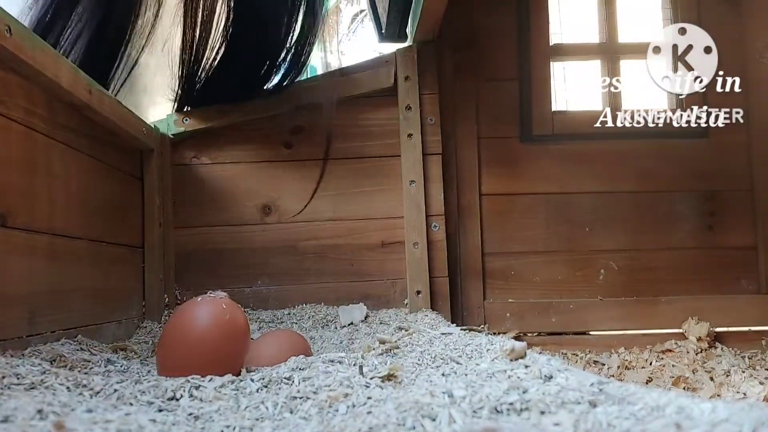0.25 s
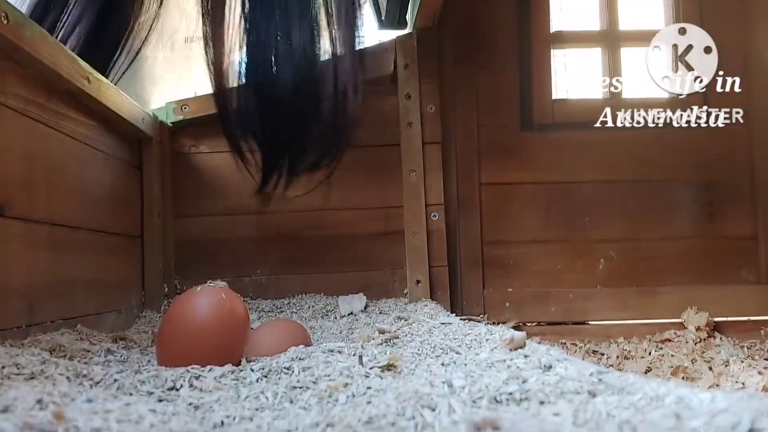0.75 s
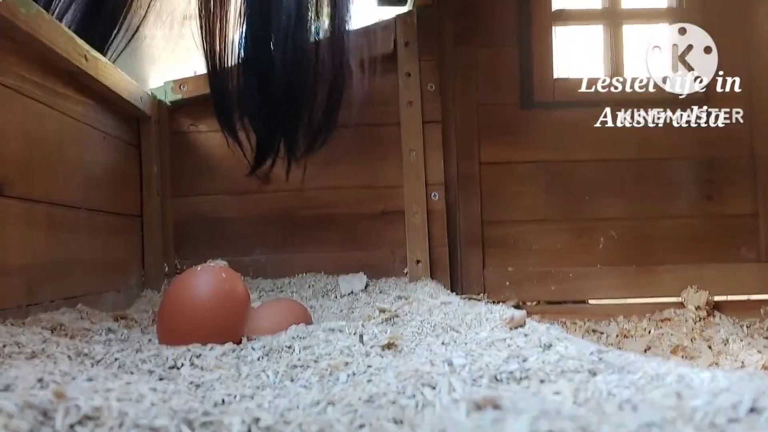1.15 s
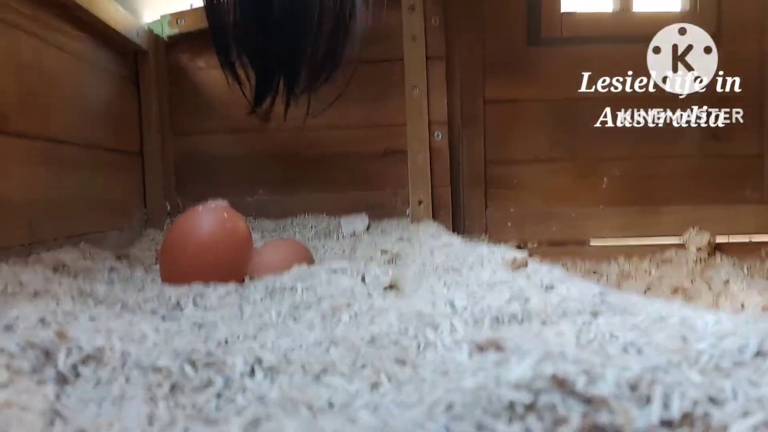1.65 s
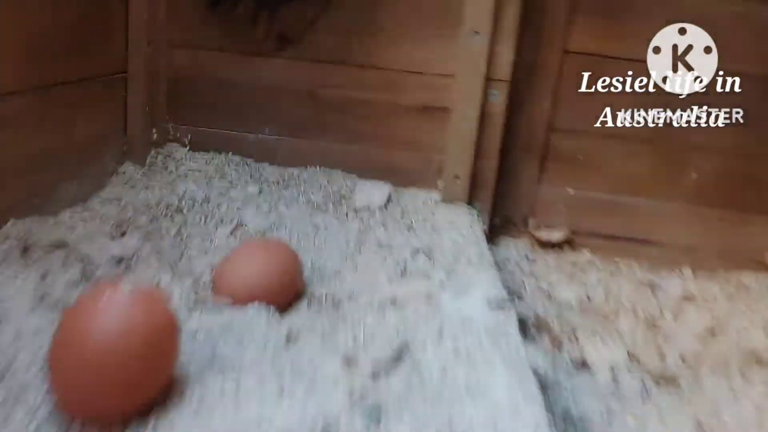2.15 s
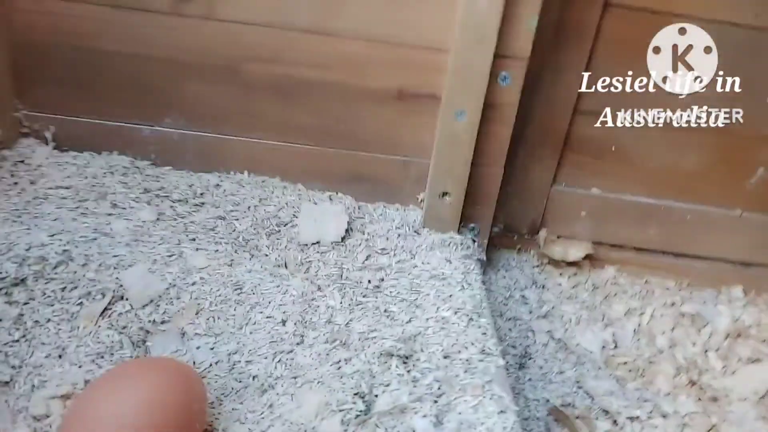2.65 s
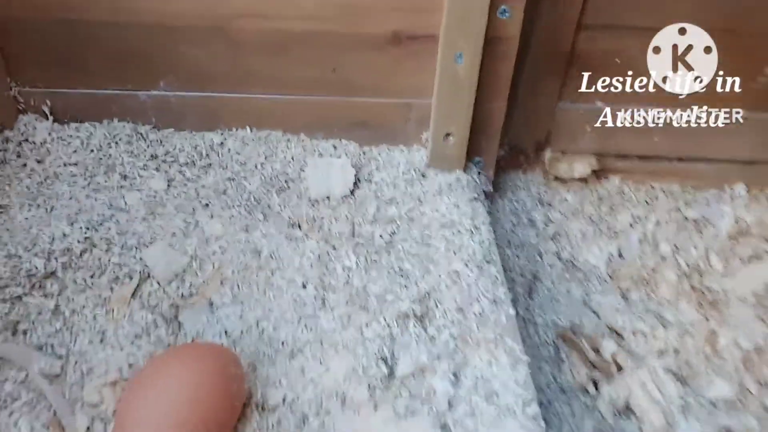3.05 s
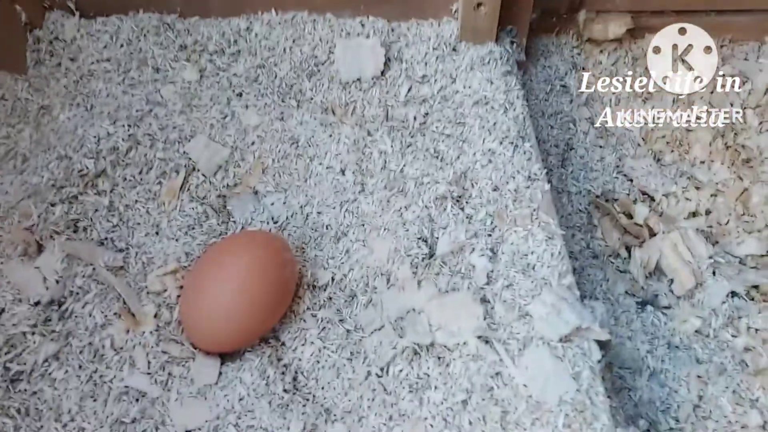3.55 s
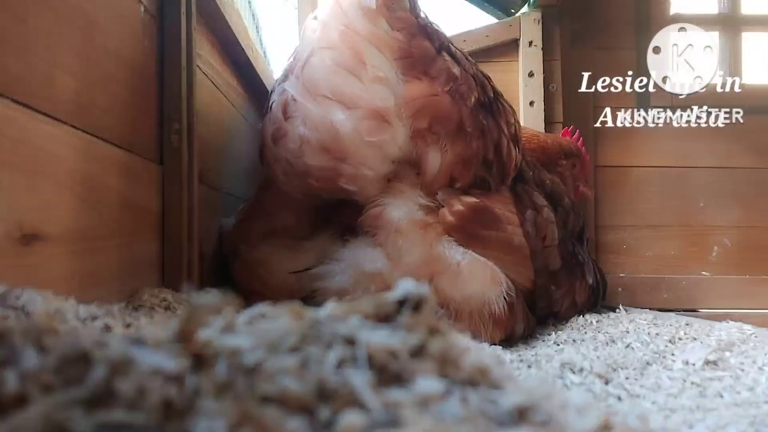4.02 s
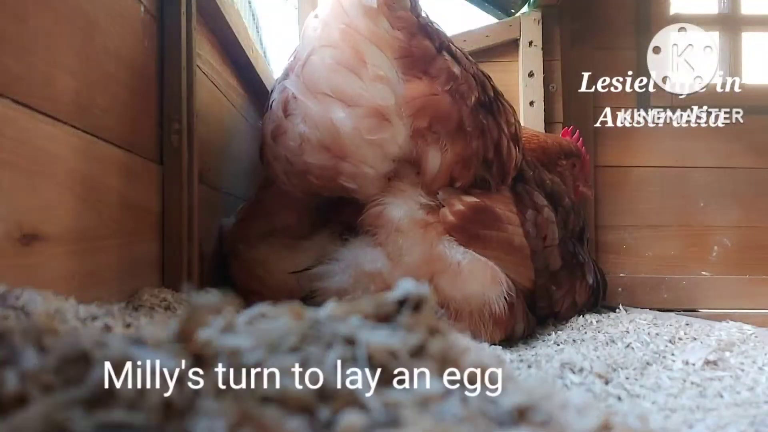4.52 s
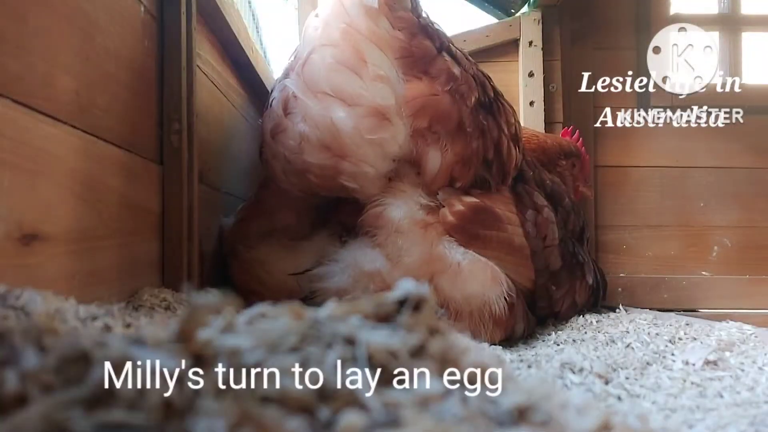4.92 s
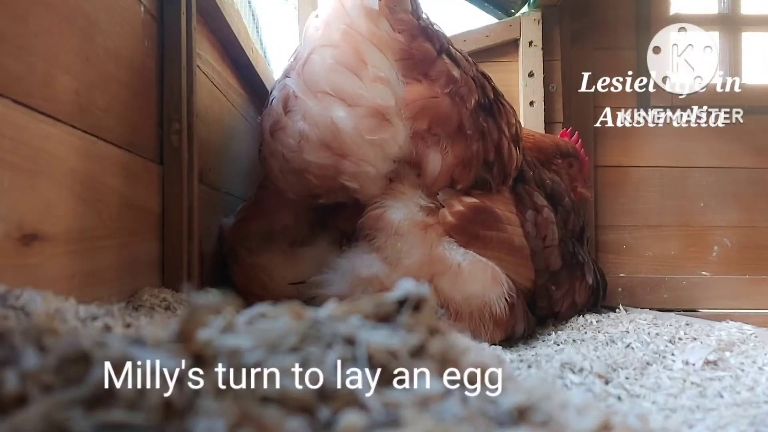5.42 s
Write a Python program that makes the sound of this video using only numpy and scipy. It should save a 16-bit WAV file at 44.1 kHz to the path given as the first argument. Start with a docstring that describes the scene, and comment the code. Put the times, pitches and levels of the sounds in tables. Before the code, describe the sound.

A stereo phone capture low in a wooden nest box, with faint hiss and low yard noise. From 0.07 s hollow knocks hit the boards, densest and strongest at 0.2 to 0.65 s, with short cracks and dry, grainy litter scraping. A loud, rough warbling squawk runs from 0.6 to 0.82 s. Single knocks follow near 0.9, 1.03, 1.38 and 1.85 s, with drags between and a faint squawk at 1.2 s. Small distant peeps come around 1.5, 2.3 and 3.1 s. A clear but softer squawk sounds at 2.5 s. A hen's trembling moan climbs in pitch from 2.4 to 3.25 s; another holds steadier from 3.35 to 3.9 s, with faint squawks near its end. Around 3.6 to 3.9 s the background changes to swelling low rumble and a wavering low hum. Very faint peeps pass at 4.5 s, then quiet downward clucks at 4.75, 4.97 and 5.05 s; rumble continues to the end.

```python
"""Soft hiss and low yard noise come first, then knocks on a wooden nest box and the scrape of its litter.
A fowl squawks with a warbling pitch, small peeps sound far off, a hen moans and others cluck late on.
Knocks ring a few decaying tones; litter is grainy noise; the birds are stacks of partials shaped by a throat.
Around 3.6 to 3.9 s the yard noise gives way to a low rumble and a wavering hum, made of noise and a sine.
Echoes of the birds fade out at about 3.91 s and return at 4.4 s."""
import sys
import numpy as np
from scipy import signal
from scipy.fft import rfft, irfft
from scipy.io import wavfile
from scipy.ndimage import uniform_filter1d

SR = 44100
rng = np.random.default_rng(int(sys.argv[2]) if len(sys.argv) > 2 else 0)


def store_pcm(level_fs):
    """Save levels as 16-bit WAV."""
    pcm = np.round(np.clip(level_fs, -1, 1) * 32767).astype(np.int16)
    wavfile.write(sys.argv[1], SR, np.atleast_2d(pcm).T)


N = 250488  # length in samples


def undb(db):
    """Turns decibels into a plain gain."""
    return 10 ** (np.asarray(db) / 20)


def unit(x):
    """Scales a signal to an average strength (rms) of 1."""
    return x / np.sqrt(np.mean(x ** 2))


def at_hz(table, hz):
    """Reads a value between (frequency, value) points, on a log-frequency axis."""
    f, v = np.transpose(table)
    return np.interp(np.log(np.maximum(hz, 1)), np.log(np.maximum(f, 1)), v)


def columns(rows):
    """Turns each column of a timed table into a curve as long as the whole sound."""
    s, *cols = np.transpose(rows)
    return [np.interp(np.arange(N) / SR, s, c) for c in cols]


def colour(x, table):
    """Shapes the spectrum by a (frequency, level) table and sets the rms to 1."""
    gain = undb(at_hz(table, np.arange(N // 2 + 1) * SR / N))
    return unit(irfft(rfft(x) * gain, N))


def walk(rate, size=N):
    """Smooth random wandering that changes about rate times a second; rms 1."""
    k = max(int(SR / rate), 1)
    smooth = uniform_filter1d(rng.standard_normal(size), k, mode="wrap")
    return unit(uniform_filter1d(smooth, k, mode="wrap"))


def ring(x, modes):
    """Each push in x starts decaying sines, as in a struck box."""
    out = 0
    for hz, db, t60 in modes:
        pole = np.exp((2j * np.pi * hz - np.log(1000) / t60) / SR)
        out = out + undb(db) * signal.lfilter([1], [1, -pole], x).imag
    return out


ALIKE_HZ, ALIKE_MOST = 598, 0.93  # where likeness has halved [Hz], likeness in the deep bass [0-1]


def diffuse(make):
    """Sound from all round: much alike at both ports in the bass, unrelated in the treble."""
    f = np.arange(N // 2 + 1) * SR / N
    alike = ALIKE_MOST / (1 + (f / ALIKE_HZ) ** 3)
    mid = rfft(make()) * np.sqrt((1 + alike) / 2)
    side = rfft(make()) * np.sqrt((1 - alike) / 2)
    return irfft(np.array([mid + side, mid - side]), N)


def noise(table):
    """Steady noise from all round, coloured by a table."""
    return diffuse(lambda: colour(rng.standard_normal(N), table))


# Colour of the microphone hiss: (frequency [Hz], relative level [dB per Hz])
HISS_COLOUR = [(300, -5.5), (2000, -5.5), (5000, -13), (8000, -10), (11000, -4), (13500, -5),
               (15500, -12.5)]
# Colour of the yard noise: (frequency [Hz], relative level [dB per Hz])
YARD_COLOUR = [(15, -34), (25, -1), (86, -3), (125, -10.5), (157, -27), (259, -30), (1170, -43.5),
               (1240, -29.5), (1960, -29.5), (2220, -37), (3500, -39), (4550, -64), (7700, -120)]
# Colour of the low rumble: (frequency [Hz], relative level [dB per Hz])
RUMBLE_COLOUR = [(30, -36.5), (50, -16), (62, -4), (67, -0.5), (73, -6.5), (85, -18), (130, -40),
                 (400, -84)]
# Colour of the broader noise around the rumble: (frequency [Hz], relative level [dB per Hz])
SKIRT_COLOUR = [(30, -18.5), (70, -1.5), (160, -9), (220, -3.5), (300, -1.5), (450, -13), (800, -23.5),
                (1200, -34), (2500, -58.5)]
# Swells of rumble and hum: (time [s], rumble level [dB], hum level [dB])
RUMBLE_SWELLS = [(3.7, -76, -95), (3.81, -58, -59.5), (4.01, -63, -88), (4.11, -61.5, -61),
                 (4.45, -53.5, -56), (4.69, -58, -56), (5.17, -67.5, -74), (5.33, -52.5, -65.5),
                 (5.53, -59, -56.5), (5.68, -59, -61)]
HISS_DB, YARD_DB, SKIRT_DB = -79.5, -67, -61.5
HUM_HZ = 251.4  # the pitch wavers around this


def background():
    """Hiss is steady noise; yard noise crossfades to noisy rumble and a sine hum of wavering pitch."""
    rumble_db, hum_db = columns(RUMBLE_SWELLS)
    rumble = undb(rumble_db) * noise(RUMBLE_COLOUR)
    hum_phase = 2 * np.pi * np.cumsum(HUM_HZ + 2.5 * walk(10)) / SR
    hum = undb(hum_db + 1.2 * walk(17)) * np.sqrt(2) * np.sin(hum_phase)
    skirt = undb(SKIRT_DB + 0.5 * walk(8.3)) * noise(SKIRT_COLOUR)
    fade = columns([(3.6, 0.12), (3.9, 1)])[0]  # a little rumble is there from the start
    yard = undb(YARD_DB) * noise(YARD_COLOUR)
    return undb(HISS_DB) * noise(HISS_COLOUR) + (1 - fade) * yard + fade * (rumble + hum + skirt)


# Tones of the air in the box: (frequency [Hz], strength [dB], time to fall 60 dB [s])
BOOM_MODES = [(308.2, 0.5, .08), (284, -25, 0.037), (417, -21, 0.15), (560, -39, 0.017), (750, -30, 0.014)]
# Low tone of the boards: (frequency [Hz], strength [dB], time to fall 60 dB [s])
THUD_MODE = [(105.5, 0, 0.059)]
# Colour of the crack: (frequency [Hz], relative level [dB per Hz])
CRACK_COLOUR = [(400, -10), (800, -10), (1100, -8.5), (1600, -2.5), (2000, 1), (2600, 0), (3500, -13),
                (5000, -22.5), (8000, -43)]
# Colour of the bright part of knocks and litter: (frequency [Hz], relative level [dB per Hz])
TREBLE_COLOUR = [(2350, -5.5), (4000, -4), (5370, -5.5), (6590, -5.5), (8400, -6.5), (12000, -5.5),
                 (15500, -15)]
# Strength of each blow, before its shape is applied:
# (time [s], boom [dB], thud [dB], crack [dB], bright tick [dB])
KNOCKS = [(.070, -42.5, -41, -45.5, -87), (.22, -31.5, -57, -35.5, -61), (.264, -25, -60, -34, -42),
          (0.312, -36, -59, -62, -51), (.405, -27, -40, -28, -41), (.429, -22, -48, -52, -44.5),
          (.468, -30.5, -31, -38.5, -40.5), (0.525, -67, -57, -54, -55), (.549, -41, -69, -78, -79),
          (.628, -31.5, -37.5, -47, -44.5), (.911, -47, -51, -71, -77), (1.034, -31, -38.5, -31, -43),
          (1.06, -45, -41, -66, -77), (1.377, -46, -43.5, -50, -56), (1.386, -35, -42, -34.5, -36.5),
          (1.836, -43, -39.5, -43.5, -35.5), (1.888, -67, -41, -48.5, -66)]
SNAP_T60_S, CRACK_T60_S = 0.033, 0.078  # fast and slower part of the crack, time to fall 60 dB


def knocks():
    """Each blow is a soft push that rings the box air and the boards, with a short noisy crack."""
    boom, thud, crack, tick = np.zeros((4, N))
    t = np.arange(SR // 4) / SR
    fall = 0.35 * 1000 ** (-t / SNAP_T60_S) + 0.2 * 1000 ** (-t / CRACK_T60_S)
    for s, boom_db, thud_db, crack_db, tick_db in KNOCKS:
        i = int(s * SR)
        boom[i], thud[i] = undb(boom_db), undb(thud_db)
        crack[i:i + len(t)] += undb(crack_db) * fall
        tick[i:i + len(t)] += undb(tick_db) * fall
    push = np.hanning(int(0.0022 * SR))  # a blow lasts 2.2 ms
    ringing = ring(boom, BOOM_MODES) + ring(thud, THUD_MODE)
    body = np.convolve(ringing, push / push.sum())[:N]
    sides = undb([[-.8], [.8]])  # slightly louder on the right
    return body * sides + crack * noise(CRACK_COLOUR) + tick * noise(TREBLE_COLOUR)


# Litter dragged over the floor; the first row is the dying tail of a knock:
# (time of full level [s], rise [s], hold [s],
# push on the boards [dB], scrape level [dB], treble level [dB])
DRAGS = [(0.073, 0.011, 0.02, -55, -64, -93), (0.221, 0.0068, 0.066, -35.5, -47, -56),
         (0.297, 0.013, 0.044, -44.5, -48, -55.5), (0.406, .006, 0.046, -44, -56, -65.5),
         (0.458, 0.0043, 0.0075, -46.5, -48, -53.5), (0.517, .03, .04, -72, -65.5, -70),
         (.61, 0.043, 0.17, -50, -49.5, -71.5), (0.786, .03, 0.18, -52, -55, -74),
         (1.039, 0.027, 0.016, -45.5, -54, -69.5), (1.174, 0.076, 0.036, -50.5, -55, -73.5),
         (1.211, 0.04, 0.077, -53.5, -51.5, -68.5), (1.303, 0.033, 0.054, -58, -58, -70.5),
         (1.392, 0.021, 0.0067, -45, -57.5, -64), (1.761, 0.031, 0.024, -80, -78.5, -73.5),
         (1.841, 0.013, 0.074, -51, -55.5, -57.5)]
RISE_FROM_DB = -17  # relative level one rise time before full
BOARDS_FADE_DB_S, LITTER_FADE_DB_S = 341, 284  # fading speed [dB per s]
SETTLE_DB, SETTLE_FADE_DB_S = -16.5, 162  # slower tail: stray shavings slide on after a drag


def drag_gains():
    """Each row rises, holds and fades; returns the gains of boards, scrape and treble."""
    t, power = np.arange(N) / SR, 0
    fades = np.array([[BOARDS_FADE_DB_S], [LITTER_FADE_DB_S], [LITTER_FADE_DB_S]])
    for s, rise, hold, *db in DRAGS:
        after = np.maximum(t - s - hold, 0)
        rise_db = RISE_FROM_DB * np.maximum(s - t, 0) / rise
        fade_db = np.maximum(-fades * after, SETTLE_DB - SETTLE_FADE_DB_S * after)
        power = power + undb(np.array(db)[:, None] + rise_db + fade_db) ** 2
    return np.sqrt(power)


def grains():
    """Noise whose level flickers fast and slowly, like many small slips."""
    return rng.standard_normal(N) * undb(3.5 * walk(900) + 1.8 * walk(60))


# Colour of the scrape: (frequency [Hz], relative level [dB per Hz])
SCRAPE_COLOUR = [(240, -30.5), (400, 2.5), (1020, -10), (1700, -12.5), (1920, -10), (2220, -12),
                 (3620, -28.5), (4340, -31.5), (7000, -49.5), (9100, -66.5), (15400, -120)]


def shaken_boards():
    """Slips set the box air ringing, and the boards faintly."""
    return unit(ring(grains(), BOOM_MODES)) + undb(-22) * unit(ring(grains(), THUD_MODE))


def litter():
    """Shavings slip in dense grains; the same kind of slips shake the boards."""
    push, scraping, rustling = drag_gains()
    boards = diffuse(shaken_boards)
    scrape = diffuse(lambda: colour(grains(), SCRAPE_COLOUR))
    treble = diffuse(lambda: colour(grains(), TREBLE_COLOUR))
    return push * boards + scraping * scrape + rustling * treble


TREMBLE_HZ = 47.6  # average speed of a trembling voice


def voice(rows, throat, upper_hz, haze_hz, tremble=0.):
    """The bird's voice organ makes partials, the throat weights them, roughness shakes pitch and level.

    Rows: (time [s], pitch [Hz], level [dB], roughness [0-1], upper partials [dB], optional first partial [dB]).
    Partials well above upper_hz take the upper gain; towards and above haze_hz they blur into breath."""
    s, *cols = np.transpose(rows)
    i = np.arange(int(s[0] * SR), int(s[-1] * SR))
    curves = [uniform_filter1d(np.interp(i / SR, s, c), size=260) for c in cols]
    hz, db, rough, upper_db, *first_db = curves
    rough = np.clip(rough, 0, 1)
    shaken_hz = hz * (1 + 0.045 * rough * walk(140, size=len(i)))
    phase = 2 * np.pi * np.cumsum(shaken_hz) / SR

    k = np.arange(1, 21)[:, None]  # partial numbers
    gain = undb(at_hz(throat, k * hz))
    norm = np.sqrt(np.sum(gain ** 2, axis=0) / 2)  # level out the throat before the partial settings
    height = k * hz / upper_hz
    gain = gain * undb(upper_db * height ** 6 / (1 + height ** 6))
    gain[0] *= undb(sum(first_db))

    shake = 1 + 1.3 * rough * np.array([walk(300, size=len(i)) for _ in k])
    slip = np.array([walk(500, size=len(i)) for _ in k])
    slip = np.minimum((k * hz / haze_hz) ** 3, 3) * slip
    tone = np.sum(gain * shake * np.cos(k * phase + slip), axis=0) / norm
    tremble_hz = TREMBLE_HZ * (1 + 0.151 * walk(13.7, size=len(i)))
    throb = 1 + tremble * np.sin(2 * np.pi * np.cumsum(tremble_hz) / SR)
    soft_ends = signal.windows.tukey(len(i), min(600 / len(i), 1))
    out = np.zeros(N)
    out[i] = tone * throb * undb(db) * soft_ends
    return out


# Warbling squawks, one curve per call: (time [s], pitch [Hz], level [dB])
SQUAWKS = [
    [(.592, 672.5, -61.5), (.606, 705, -46.5), (.626, 809.5, -35), (.642, 830, -29), (.656, 696.5, -37),
     (.674, 757, -33), (.694, 753.5, -31), (.711, 801.6, -29.5), (.726, 684.5, -37), (.744, 735.5, -30),
     (.763, 710.4, -30.5), (.782, 755.6, -33), (.797, 795, -27), (.809, 768, -32), (.822, 737, -46)],
    [(1.175, 711, -77), (1.2, 818, -61), (1.216, 863, -56), (1.236, 730, -50), (1.26, 827, -52),
     (1.272, 820, -59), (1.291, 649, -56), (1.322, 808, -48.5), (1.334, 805, -53), (1.35, 700, -65)],
    [(2.488, 577, -69), (2.506, 671, -45), (2.536, 744, -37), (2.543, 751.5, -38.5), (2.556, 634.4, -37.5),
     (2.578, 698, -35.5), (2.598, 751, -37.5), (2.608, 742.6, -36.5), (2.622, 688.5, -39.5),
     (2.638, 686, -53)],
    [(3.045, 688.7, -83), (3.08, 804, -67.5), (3.135, 682.4, -87)],
    [(3.746, 829, -73), (3.754, 885, -68.5), (3.768, 1000, -70), (3.779, 1008, -63), (3.794, 878, -59)],
    [(3.796, 760, -60), (3.81, 745, -66), (3.824, 798, -61), (3.856, 675, -67.5), (3.876, 608, -68)],
]
# Settings per squawk: (roughness [0-1], upper partials before dulling [dB],
# pitch where dulling starts [Hz], faces away [1 = yes], echo share [dB])
SQUAWK_CALLS = [(0.2, 2, 765, 0, -20.5), (.06, -9, 726, 1, -6.5), (0.17, 3, 736, 0, -13.5),
                (0.19, 3, 800, 1, -4), (0.18, 8.5, 1100, 1, -1.5), (0.18, 10, 790, 1, -5.5)]
# Throat of a bird not facing away: (frequency [Hz], gain [dB])
SQUAWK_THROAT = [(350, -39), (600, 0), (751, -13.5), (1130, -28.5), (1430, 0), (1890, 3.5), (2180, 0.5),
                 (2960, 0.5), (3600, -17.5), (4570, -7.5), (5710, -17), (6610, -17.5), (9180, -45.5),
                 (10600, -32.5), (14000, -44)]
# Throat of a bird facing away: (frequency [Hz], gain [dB])
AWAY_THROAT = [(600, -18), (800, -1.5), (1600, -1), (2300, 2), (3000, 3), (3500, -2), (4000, -7.5),
               (5400, -10.5), (7000, -24.5), (10000, -35)]
DULL_DB_PER_HZ, DULL_MOST_DB = 0.66, 11.5  # upper partials weaken as the pitch climbs


def squawk(rows, rough, upper_db, dull_hz, away):
    """A warbling cry; the upper partials weaken where its pitch is high."""
    s, hz, db = np.transpose(rows)
    t = np.arange(s[0], s[-1], .002)
    f = np.interp(t, s, hz)
    dull_db = np.clip(DULL_DB_PER_HZ * (f - dull_hz), 0, DULL_MOST_DB)
    rows = np.transpose([t, f, np.interp(t, s, db), rough + 0 * t, upper_db - dull_db])
    throat = AWAY_THROAT if away > .5 else SQUAWK_THROAT
    return voice(rows, throat, upper_hz=3617.0, haze_hz=8500.)


# Distant peeps: (time [s], reference level, 1.5 dB under the peak setting [dB],
# reference frequency near the second partial [Hz], length [s], upper partials [dB])
PEEPS = [(1.468, -66, 1460, 0.067, -9), (1.522, -67.5, 1852, 0.081, -9), (2.258, -72.5, 1970, 0.079, 0),
         (2.315, -70.5, 1482, 0.051, -6), (2.3724, -64, 1862, 0.068, -11), (3.008, -64.5, 1896, 0.07, -21),
         (3.135, -60.5, 1943, 0.06, -0.5), (3.869, -65.5, 1856, 0.045, 6), (4.43, -80, 2010, 0.11, -20.5),
         (4.552, -81, 2010, 0.054, -20)]
# Throat of the peeping birds: (frequency [Hz], gain [dB])
PEEP_THROAT = [(500, -29.5), (950, -12.5), (1900, 0.5), (2850, -9), (3800, -12.5), (6000, -27.5),
               (9000, -45)]


def peep(s, db, hz, length, upper_db):
    """A short note that swells and fades while its pitch slides down; hz is near its second partial."""
    rows = [(s, 0.53 * hz, db - 12.0, .2, upper_db),
            (s + 0.33 * length, .505 * hz, db + 1.5, .35, upper_db),
            (s + length, .49 * hz, db - 9.0, .2, upper_db)]
    return voice(rows, PEEP_THROAT, upper_hz=2520.0, haze_hz=3850.0)


# The hen's moans, one curve per moan: (time [s], pitch [Hz], level [dB], first partial [dB])
MOANS = [
    [(2.36, 205.3, -84, -4), (2.474, 224.3, -67.5, 4.5), (2.584, 254.4, -59.5, -2), (2.635, 330.8, -66, 4),
     (2.665, 337.6, -62.5, 8.5), (2.73, 340.2, -63, 10.5), (2.822, 378.8, -63.5, -4),
     (2.925, 432.8, -60.5, -1), (3.012, 399.4, -62, 0), (3.09, 428.5, -64, 2.5), (3.13, 489.5, -58.5, 7.5),
     (3.206, 428.6, -61.5, -4.5), (3.25, 437.4, -96, -2)],
    [(3.33, 523, -105, 7), (3.376, 498.8, -56.5, -1), (3.404, 415, -61, -4), (3.462, 410.6, -64, -9),
     (3.532, 422.8, -57, -4.5), (3.68, 424.3, -56, 1), (3.725, 414.6, -59, -6), (3.76, 462, -56.5, 2),
     (3.844, 506.4, -63.5, 12), (3.91, 512, -75, 8)],
]
# Settings per moan: (roughness [0-1], upper partials at start [dB], at end [dB], blur frequency [Hz])
MOAN_CALLS = [(0.12, 4.5, -2.5, 1740), (0.08, -26.5, -3, 1750)]
# Throat of the moaning hen: (frequency [Hz], gain [dB])
MOAN_THROAT = [(150, 13.5), (350, 2), (600, -10.5), (900, -3), (1300, -9.5), (1750, -28.5), (2300, -6),
               (3000, -22.5), (5000, -29)]
TREMBLE_DEPTH = 0.3  # part of the level that trembles


def moan(rows, rough, first_upper_db, last_upper_db, haze_hz):
    """A long trembling note whose upper partials grow or shrink steadily as it goes."""
    s, hz, db, first_db = np.transpose(rows)
    upper_db = np.interp(s, s[[0, -1]], [first_upper_db, last_upper_db])
    rows = np.transpose([s, hz, db, rough + 0 * s, upper_db, first_db])
    return voice(rows, MOAN_THROAT, upper_hz=1700., haze_hz=haze_hz, tremble=TREMBLE_DEPTH)


# Clucks further off: (which hen [0 or 1], time [s], length before the fade [s], first pitch [Hz],
# last pitch [Hz], glide [s], level [dB], upper partials [dB])
CLUCKS = [(0, 4.748, 0.08, 693, 625.5, .07, -67.5, -3.5), (1, 4.974, 0.06, 697, 594, 0.062, -62.5, -7),
          (1, 5.045, .05, 581, 567.7, .04, -65.5, -1)]
# Throats of the two clucking hens, one list each: (frequency [Hz], gain [dB])
CLUCK_THROATS = [
    [(300, -22), (650, -3), (1300, 5), (2000, -3.5), (2600, -22), (3400, -11.5), (4200, -22), (7000, -40)],
    [(300, -21), (620, 7.5), (1200, -1), (1750, -10), (2400, -5.5), (3000, -18), (3500, -9), (4600, -11),
     (7000, -49)],
]
CLUCK_ATTACK_S, CLUCK_FADE_S, CLUCK_FADE_DB = 0.011, 0.064, -24
CLUCK_ROUGH = 0.3  # roughness [0-1]


def cluck(s, length, first_hz, last_hz, glide, db, upper_db, throat):
    """Sets in quickly, slides down in pitch, holds and fades."""
    t = np.arange(0, length + CLUCK_FADE_S, .002)
    slide = np.cos(np.pi / 2 * np.minimum(t / glide, 1)) ** 2
    hz = last_hz + (first_hz - last_hz) * slide
    level = db + np.interp(t, [0, CLUCK_ATTACK_S, length, length + CLUCK_FADE_S],
                           [CLUCK_FADE_DB, 0, 0, CLUCK_FADE_DB])
    rows = np.transpose([s + t, hz, level, CLUCK_ROUGH + 0 * t, upper_db + 0 * t])
    return voice(rows, throat, upper_hz=2205.0, haze_hz=3640.0)


# Level at the two microphone ports for a bird outside: (frequency [Hz], left minus right [dB])
BIRD_BALANCE = [(60, -1.5), (110, -0.5), (200, 2), (380, -7.5), (700, 0.5), (1290, -8.5), (2380, -5),
                (4400, -5.5), (8120, -7.5), (15000, 3.5)]
# Phase between the two ports per frequency; irregular above 7 kHz:
# (frequency [Hz], left leads by [radians])
BIRD_PHASE = [(0, -0.5), (690, -1.33), (2840, -6), (3700, -8.5), (4650, -3.5), (6370, -1.3), (7750, -3.5),
              (8270, -0.5), (9990, -4), (10700, 2.5), (12200, -2.5), (14000, -9), (14600, 5), (15300, -5)]
RUN_T60_S = 0.38  # time for echoes in the run to fall 60 dB


def birds():
    """Every call, direct through the two ports and again off the walls of the run."""
    squawks = [squawk(c, *call[:-1]) for c, call in zip(SQUAWKS, SQUAWK_CALLS)]
    peeps = sum(peep(*p) for p in PEEPS)
    hen = sum(moan(c, *call) for c, call in zip(MOANS, MOAN_CALLS))
    far = sum(cluck(*c, CLUCK_THROATS[int(which)]) for which, *c in CLUCKS)

    f = np.arange(N // 2 + 1) * SR / N
    half_phase = .5 * np.interp(f, *np.transpose(BIRD_PHASE))
    half = undb(at_hz(BIRD_BALANCE, f) / 2) * np.exp(1j * half_phase)  # half the difference per port
    direct = irfft(rfft(sum(squawks) + far + peeps) * np.array([half, 1 / half]), N)
    # the hen reaches the right port first, 14 samples ahead
    direct += np.array([undb(-9.0) * np.roll(hen, shift=14), hen])

    t = np.arange(SR) / SR
    echo = rng.standard_normal((2, SR)) * 1000 ** (-t / RUN_T60_S) * np.minimum(t / .008, 1)
    echo = signal.lfilter([1], [1, -.6], echo)  # walls and air dull the treble
    echo = echo / np.sqrt(np.sum(echo ** 2) / 2)
    wet = sum(undb(call[-1]) * c for c, call in zip(squawks, SQUAWK_CALLS))
    wet = wet + undb(-8.5) * hen + undb(-5.0) * far + undb(-7) * peeps
    wet = wet * (.7 + .7 * walk(250))  # random flutter of level broadens the echoes' steady tones
    tail = signal.fftconvolve(wet[None], echo, axes=1)[:, :N]
    echo_on = columns([(3.905, 1), (3.915, 0), (4.4, 0), (4.41, 1)])[0]
    return direct + tail * echo_on


def scene():
    """Adds all layers, left and right."""
    return background() + knocks() + litter() + birds()


def record(dry):
    """The phone's microphone drops the deepest bass and cuts the top."""
    bass_cut = signal.butter(4, 48, "high", fs=SR, output="sos")
    top_cut = signal.ellip(10, .2, 70, 15500, fs=SR, output="sos")
    return signal.sosfilt(top_cut, signal.sosfilt(bass_cut, dry))


dry = scene()
out = record(dry)
store_pcm(out)
```